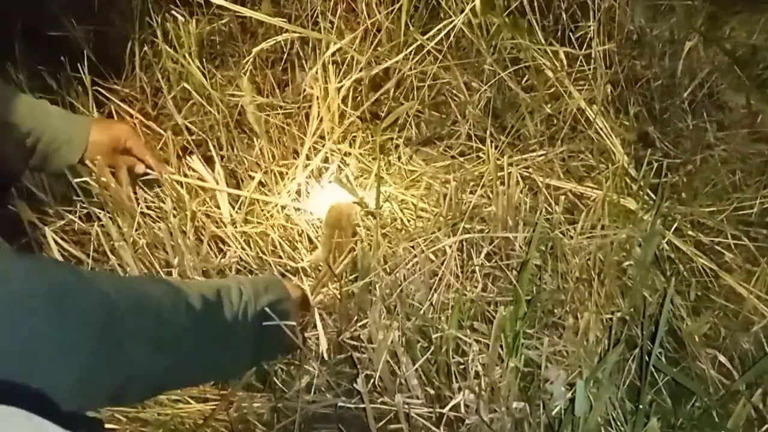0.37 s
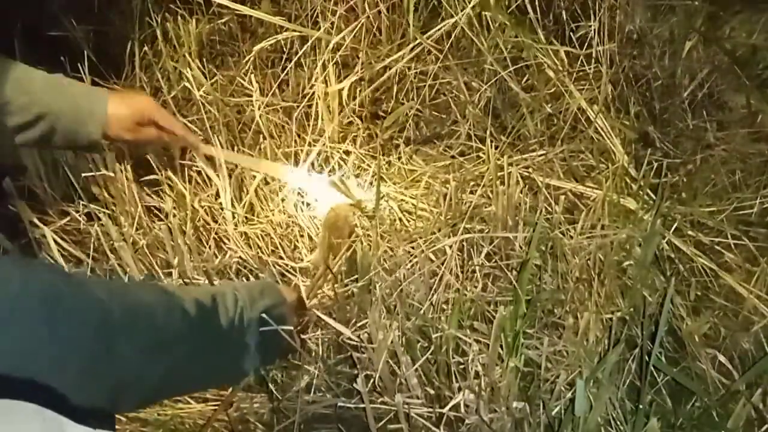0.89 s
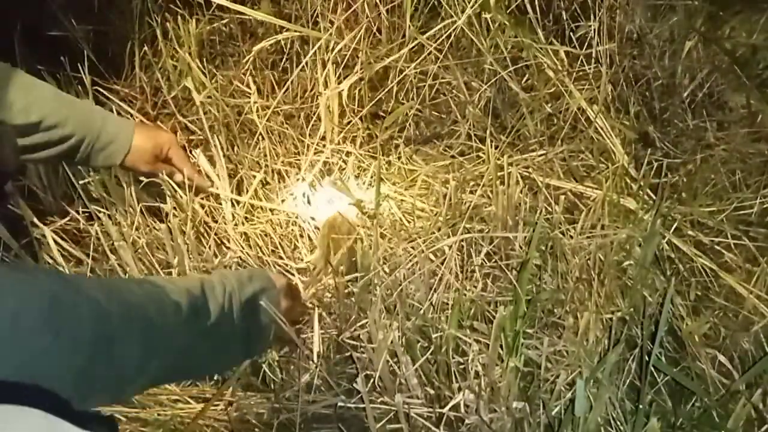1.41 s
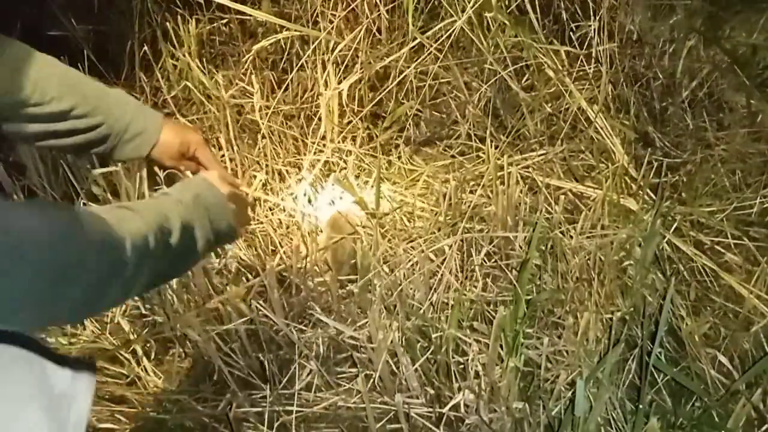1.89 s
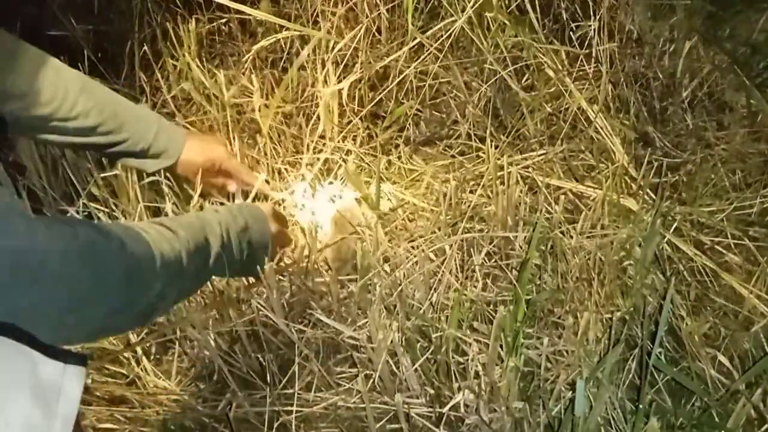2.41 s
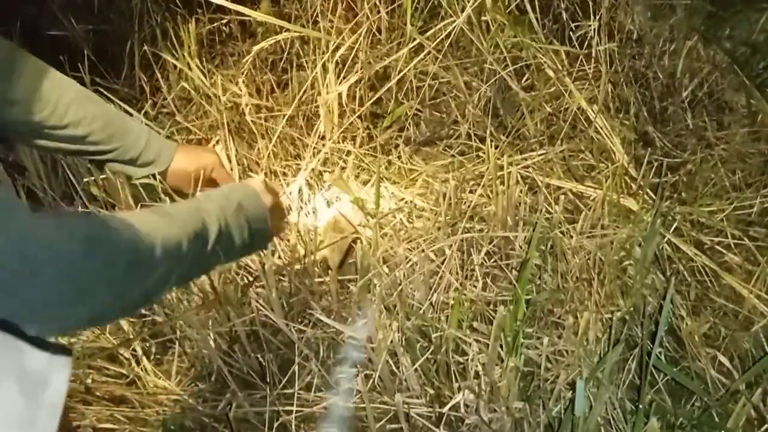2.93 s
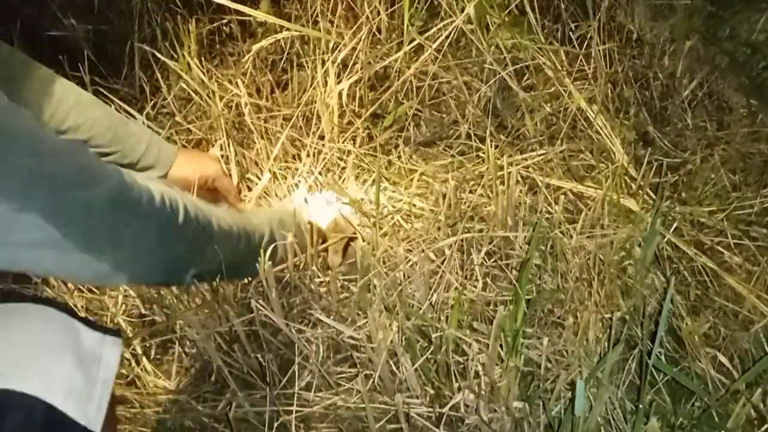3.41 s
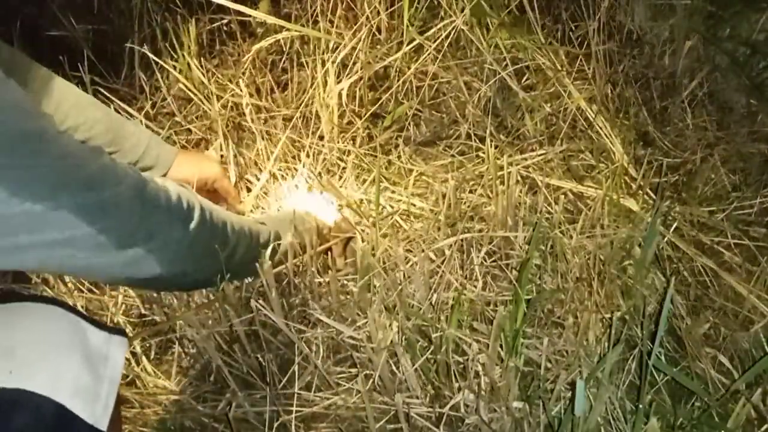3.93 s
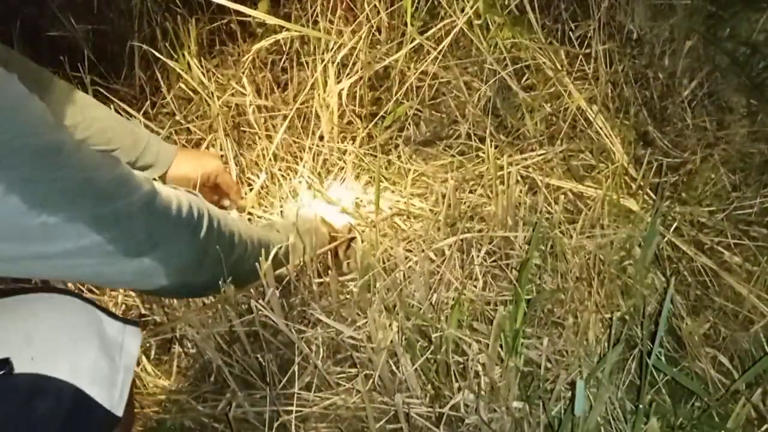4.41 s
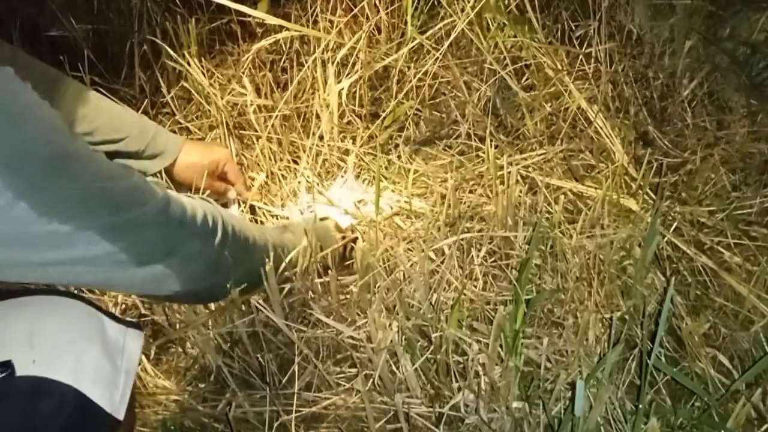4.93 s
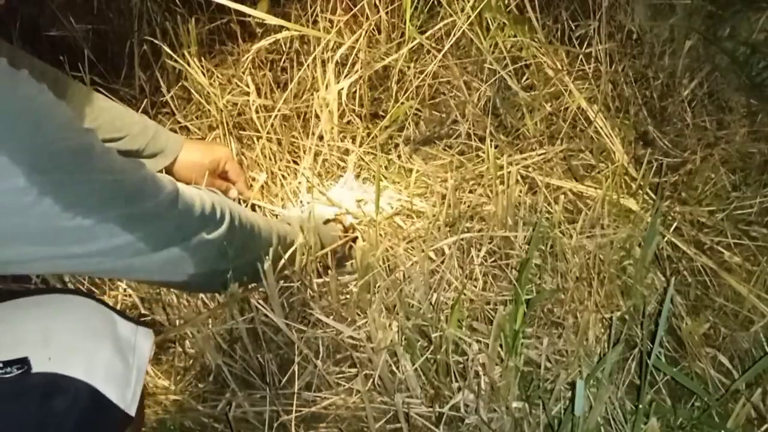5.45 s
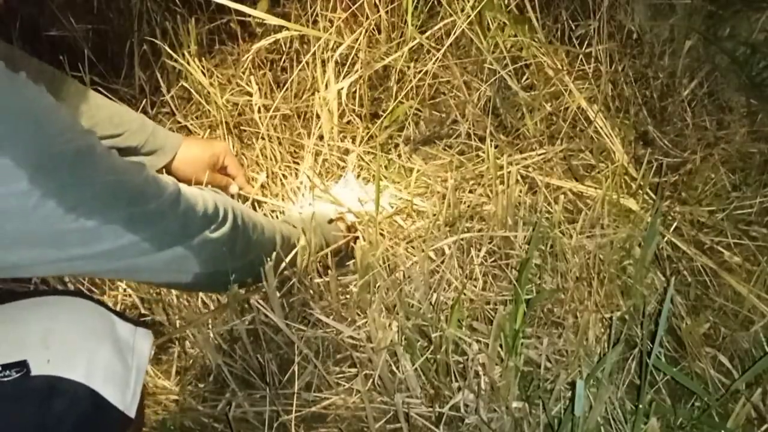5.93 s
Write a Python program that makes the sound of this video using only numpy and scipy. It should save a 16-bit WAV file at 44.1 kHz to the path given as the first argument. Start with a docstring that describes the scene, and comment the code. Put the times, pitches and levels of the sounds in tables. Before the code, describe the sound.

Night grassland insects trill and chirp densely over a faint low engine hum, with small dry grass cracks, a soft knock and one rough croak.

```python
"""Grassland at night, one microphone worn by a person standing in dry grass: two crickets close by chirp in
pulsed tones, tree crickets trill near and far, a katydid buzzes and ticks, and distant trills blur into a
chorus. Far off a small engine hums at its firing rate with a noisy exhaust rasp; a frog croaks once in pulsed
noise. Hands part the grass beside the microphone: short cracks, grainy rustles and a soft knock on the ground."""
import sys
import numpy as np
from scipy import signal
from scipy.fft import rfft, irfft, next_fast_len
from scipy.io import wavfile
from scipy.ndimage import uniform_filter1d, map_coordinates

SR = 44100
rng = np.random.default_rng(int(sys.argv[2]) if len(sys.argv) > 2 else 0)


def gain_from_db(level_db):
    """Turn a decibel level (scalar or array-like) into a linear amplitude factor."""
    decades = np.asarray(level_db, float) / 20
    return 10 ** decades


def persist_wave(psi):
    """Save psi, clipped to +-1, as 16-bit WAV."""
    counts = np.round(np.clip(psi, -1, 1) * 32767).astype(np.int16)
    wavfile.write(sys.argv[1], SR, np.atleast_2d(counts).T)


N = 267596
T = np.arange(N) / SR
TOP_HZ = 15500  # upper band limit

# night air, relative spectrum: f/Hz, level/dB (per Hz)
AIR = [(20, -15), (45, -20.5), (75, 2.5), (130, -7), (200, -19), (420, -24), (800, -21.5), (1600, -25.5),
       (2550, -59), (3400, -27.5), (4000, -41), (5000, -39.5), (6300, -28), (8300, -33.5), (10100, -45),
       (16000, -37)]

# far engine, hum at the firing rate: t/s, level/dB
HUM_LEVEL = [(0.0, -41), (0.93, -37), (2.09, -40.5), (4.17, -35.5), (5.09, -34.5), (6.07, -40.5)]
FIRING_HZ = 73.25
# further orders of the hum, relative to one another: multiple of the firing rate, level/dB
ORDERS = [(4 / 3, -18), (5 / 3, -22), (3, -27)]
# the octave of the hum: t/s, level/dB
OCTAVE_LEVEL = [(0, -55.5), (.8, -56), (2, -52), (3.9, -50.5), (4.5, -55), (6.07, -53.5)]
# exhaust rasp, relative spectrum: f/Hz, level/dB (per Hz)
RASP = [(500, -18), (800, -30), (900, -8), (960, 3.5), (1030, -1), (1100, 3), (1180, -2.5), (1400, -8),
        (1800, -30)]
# exhaust rasp: t/s, level/dB
RASP_LEVEL = [(0, -46), (1, -50.5), (1.7, -47.5), (3.6, -49.5), (3.66, -52), (4.2, -54), (6.07, -53.5)]
# duller rasp, relative spectrum: f/Hz, level/dB (per Hz)
DULL_RASP = [(350, -25), (450, -5.5), (700, -12.5), (830, 3.5), (950, -10), (1200, -39)]
# the duller rasp clears as the engine runs on: one drop, then a steady fade
DULL_DB, DULL_UNTIL_S, DULL_DROP_DB, DULL_FADE_DB_PER_S = -51.5, 0.64, 5, 2
# spells when the pipe rings at each puff: t/s, length/s, f/Hz, level/dB
PIPE_RINGS = [(1.045, 0.6, 970, -50), (1.564, 0.34, 1112, -47.5), (1.905, 0.93, 967, -52),
              (2.05, 0.5, 1090, -49), (2.89, .74, 1097, -49.5), (3.25, 0.48, 972, -60)]

# trills of the nearest tree cricket: t/s, length/s, level/dB
TRILLS = [(0, 0.04, -39), (0.274, .31, -30.5), (0.833, 0.32, -30), (1.423, 0.33, -34), (1.855, 0.34, -31.5),
          (2.435, 0.3, -32), (2.929, 0.3, -30), (3.457, 0.28, -29), (3.955, .32, -30.5),
          (4.594, .33, -30.5), (5.108, 0.36, -32.5), (5.663, 0.24, -31), (5.93, .2, -34.5)]
TRILL_RATE = 60.7  # wing strokes per s
GROVE_DB, GROVE_HIGH_DB = -43, -54.5  # farther tree crickets: middle voices, high voice
# swells of the middle voices: t/s, half width/s, level/dB
GROVE_SWELLS = [(1.6, 0.18, 3), (3.25, 1, -1)]

# distant trill voices and overtones in phrases; 5960 Hz is the tree crickets' octave,
# 1823 Hz a lower partial of the 2161 Hz trill:
# f/Hz, pitch scatter/Hz, fall in a stroke/Hz, rate/(strokes per s), drift/strokes,
# phrase/s, first phrase t/s, sung share of the phrase, level/dB (before the phrasing)
CHORUS = [(2161, 21.4, 44, 120.7, 0.15, 0.28, 0.191, 0.98, -47),
          (2075, 12, 15, 120.7, 0.16, 1, 0.058, 0.99, -50.5),
          (2231, 25, 29, 123, 0.12, 0.72, 0.14, 1, -51.5), (2743, 18, 89, 57, 0.11, 0.48, 0.29, 0.99, -58),
          (1823, 8.1, 59, 110, 0.11, 0.32, 0.0087, 0.91, -59.5),
          (5340, 60, 820, 18.1, .15, 0.9, 0.0059, 0.93, -70),
          (5340, 32, 730, 36.3, 0.213, 0.56, 0.018, 0.89, -72),
          (5960, 70, 180, 58, 0.72, 0.36, 0.018, 0.78, -61.5),
          (7200, 42, 79, 101, .15, 0.24, 0.043, .99, -58),
          (7307, 75, 180, 171, 1.5, .328, 0.225, 0.64, -50.5),
          (8960, 210, 130, 170, 0.68, 0.15, 0.0065, 0.84, -69),
          (9530, 130, 200, 230, 0.58, .119, 0.023, 0.35, -71)]
# phrases of a climbing bush cricket: start t/s
CLIMBS = [-.15, .19, .54, .86, 1.12, 1.44, 1.78, 2.15, 2.5, 2.86, 3.18, 3.52, 3.87, 4.2, 4.52, 4.82, 5.1,
          5.42, 5.74, 6.04, 6.4]
CLIMB_FROM_HZ, CLIMB_TO_HZ = 7560, 7960
CLIMB_SHARE, CLIMB_REST = 0.6, .06  # top reached at, and rest, as shares of the phrase
# bush cricket: t/s, level/dB
CLIMB_LEVEL = [(0, -59), (1.6, -61), (2.7, -58), (3.4, -60.5), (6.07, -60)]

# buzzes inside the katydid's wing cycle: from, to (shares of the cycle), level/dB
BUZZ = [(.02, .13, -67), (.135, .155, -62), (.18, 0.655, -60), (.7, .82, -61)]
# katydid's buzz, relative spectrum: f/Hz, level/dB (per Hz)
KATYDID = [(9000, -40), (11000, -29), (13900, -35), (14500, -3), (15000, -2), (15600, -4)]
# katydid's pace: t/s, wing cycles done
PACE = [(-.0745, -1), (.0188, 0), (1.0455, 11), (1.522, 16), (2.926, 31), (5.025, 54), (6.134, 66)]
TICK_JITTER_S = .0012

# how a near cricket sings: f/Hz, rate/(wing strokes per s), level/dB, warm-up/strokes
HIGH = (6811, 104.5, -36.5, 0.7)
# moods of the lower cricket, same columns
STEADY = (6594, 103.5, -36, 1.07)
HURRIED = (6597, 116.5, -36.5, 2.5)
TIMID = (6445, 100, -45, 0.5)
# the higher cricket keeps one beat through chirps and rests, slowing a little as it tires
FIRST_BEAT_S, BEAT_S, LONGER_PER_BEAT_S = .0518, .009382, 1.176e-7
SHORT_STROKES, REST_BEATS = 8, 11
# chirps with one stroke more: chirp number
ONE_MORE_STROKE = [0, 1, 2, 3, 4, 5, 6, 12, 14, 16, 20, 22, 24, 28, 30]
# chirps whose rest is one beat shorter: chirp number
REST_CUT = [0, 1, 2, 4, 5, 11]
# chirps whose rest is one beat longer: chirp number
REST_DRAWN_OUT = [24]
# the lower cricket finds its rhythm: t/s, wing strokes, mood
LOW_CHIRPS = [(0.1058, 4, STEADY), (0.2623, 4.4, STEADY), (1.077, 1.7, TIMID), (1.775, 4.8, TIMID),
              (1.98, 1, TIMID), (2.117, 3, TIMID), (2.247, 4, TIMID), (2.298, 3.5, HURRIED),
              (2.414, 8, HURRIED), (2.555, 10, HURRIED), (2.724, 8.3, HURRIED), (2.889, 10.4, HURRIED),
              (3.06, 10, HURRIED), (3.2628, 7.4, STEADY), (3.4578, 7.2, STEADY), (3.6555, 5, STEADY),
              (3.815, 6, STEADY), (3.992, 7.2, STEADY), (4.1578, 8, STEADY), (5.8097, 8.5, STEADY),
              (5.985, 7.4, STEADY)]
RUN_S, RUN_EVERY_S, RUN_CHIRPS, RUN_STROKES = 4.3427, .18446, 8, 7  # its even run

# grass parted: t/s, level/dB, rise/s, fall/s
RUSTLES = [(.2, -53, 0.065, 0.29), (1.86, -59, 0.079, 0.22)]
# rustling grass, relative spectrum: f/Hz, level/dB (per Hz)
GRASS = [(1500, -34), (4000, -4.5), (9000, -5), (13000, -12), (16000, -20)]
# dry stalks snap: t/s, level/dB, f/Hz, t60/s
SNAPS = [(0.2568, -34.5, 9550, .016), (.2588, -40, 11000, .01), (.2605, -42, 5700, .008),
         (.342, -37, 5500, 0.0055), (2.571, -42, 8000, .004), (4.489, -31.5, 15200, 0.0058),
         (4.4893, -44, 5000, .006), (5.9135, -42, 4470, 0.0083)]
# a soft knock on the ground: t/s, level/dB (before the soil's own levels)
KNOCK = [(4.843, -37.5), (4.859, -35), (4.874, -37)]
# ringing of the knocked soil: f/Hz, relative level/dB, t60/s
SOIL = [(165, 2.5, 0.14), (357, 9, 0.044), (900, -1, 0.051)]

# frog's throat, relative spectrum: f/Hz, level/dB (per Hz)
THROAT = [(570, -33), (640, 3.5), (700, 9), (860, 8), (1050, -35)]
# frog's vocal sac, relative spectrum: f/Hz, level/dB (per Hz)
SAC = [(750, -8), (900, 1), (980, 0), (1020, 11.5), (1070, 5.5), (1200, -3.5), (1700, -16.5)]
CROAK_S, CROAK_ATTACK_S = 4.25, 0.0086
THROAT_DB, THROAT_HOLD_S, THROAT_RELEASE_S = -47.5, 0.3, .05
# the sac starts slack, fills, empties
SAC_DB, SAC_FILL_S, SAC_HOLD_S, SAC_RELEASE_S, SAC_SLACK_DB = -39.5, 0.19, 0.2, 0.14, 14


def unit(x):
    """Scaled to rms 1."""
    return x / np.sqrt(np.mean(x ** 2) + 1e-20)


def curve(rows):
    """One value per sample from (time, value) rows."""
    s, values = np.transpose(rows)
    return np.interp(T, s, values)


def wobble(rate):
    """A smooth random curve, rate knots a second."""
    return map_coordinates(rng.standard_normal(int(N * rate / SR) + 4), [T * rate])


def shape(start_s, rise_s, hold_s, fall_s, depth_db):
    """Attack, hold and release in dB: 0 at the top, -depth_db at both ends, -120 outside."""
    corners = start_s + np.cumsum([0, rise_s, hold_s, fall_s])
    return np.interp(T, corners, [-depth_db, 0, 0, -depth_db], -120, -120)


def coloured(x, points):
    """x shaped by (Hz, dB) points on a log frequency axis, rms 1."""
    m = next_fast_len(N + 8192)
    hz, db = np.transpose(points)
    log_hz = np.log(np.fft.rfftfreq(m, 1 / SR) + 1)
    gain = gain_from_db(np.interp(log_hz, np.log(hz), db, -120, -120))
    return unit(irfft(rfft(x, m) * gain, m)[:N])


def strokes(count, hz, scatter_hz, fall_hz, rate, duty, scatter_db, overtone_db=-60, loose=0.93):
    """One tone pulse per wing stroke (count: running stroke number); pitch falls as the wing closes."""
    k = np.floor(count).astype(int)
    u = np.clip((count - k) / duty, 0, 1)  # progress through the stroke
    luck = rng.standard_normal((k.max() - k.min() + 1, 3))
    slip = loose * np.cumsum(luck[:, 1])[k - k.min()]  # each stroke keeps the phase only loosely
    luck = luck[k - k.min()]
    bend = scatter_hz * luck[:, 0] * u + fall_hz * (u - u * u) / 2  # falls from +fall/2 to -fall/2
    cycles = np.cumsum(hz + 0 * u) / SR + bend * duty / rate
    phase = 2 * np.pi * cycles + slip
    envelope = gain_from_db(scatter_db * luck[:, 2]) * np.sin(np.pi * u) ** 0.77
    return envelope * (np.sin(phase) + gain_from_db(overtone_db) * np.sin(2 * phase))


def field(x, t60, wet_db):
    """Scatter from grass and bushes: a short noisy tail that changes as the leaves move."""
    t = np.arange(SR // 3) / SR
    tails = rng.standard_normal((2, len(t))) * gain_from_db(-60 * t / t60) * (t > .004)
    a, b = signal.fftconvolve(x[None], tails / np.linalg.norm(tails[0]), axes=1)[:, :N]
    sway = 2 * wobble(3)
    return x + gain_from_db(wet_db) * (np.cos(sway) * a + np.sin(sway) * b)


def night_air():
    """Broadband noise of the open air, its level wavering slowly."""
    return gain_from_db(-44 + 0.71 * wobble(1.14)) * coloured(rng.standard_normal(N), AIR)


def pipe_ring(phase, hz):
    """The exhaust pipe rings afresh at each firing, as one short tone pulse."""
    pulses = strokes(phase / (2 * np.pi) + 0.84, hz, scatter_hz=10.3, fall_hz=16, rate=FIRING_HZ,
                     duty=0.83, scatter_db=0.5, loose=0.562)
    return unit(gain_from_db(1.3 * wobble(7.92)) * pulses)


def engine():
    """Far off: firing hum with its orders, and an exhaust rasp that puffs once a firing."""
    phase = 2 * np.pi * (FIRING_HZ * T + 0.016 * wobble(4.1))
    firing = gain_from_db(curve(HUM_LEVEL) + 0.17 * wobble(10)) * np.sin(phase)
    octave = gain_from_db(curve(OCTAVE_LEVEL) + 1.66 * wobble(4.9)) * np.sin(2 * phase)
    orders = sum(gain_from_db(db + 3.8 * wobble(5.1)) * np.sin(k * phase + 6 * rng.random()) for k, db in ORDERS)
    hum = np.sqrt(2) * (firing + octave + gain_from_db(-41.0) * orders)  # root 2: levels are rms
    puffs = 0.59 + np.maximum(np.cos(phase + 1.28), 0) ** 5
    rasp = coloured(puffs * rng.standard_normal(N), RASP)
    rasp = gain_from_db(curve(RASP_LEVEL) + 1.76 * wobble(7.14)) * rasp
    dull_db = DULL_DB - (T > DULL_UNTIL_S) * (DULL_DROP_DB + DULL_FADE_DB_PER_S * (T - DULL_UNTIL_S))
    dull = gain_from_db(dull_db) * coloured(puffs * rng.standard_normal(N), DULL_RASP)
    rings = sum(gain_from_db(db + shape(s, 0.02, length - .06, 0.028, depth_db=2)) * pipe_ring(phase, hz)
                for s, length, hz, db in PIPE_RINGS)
    return hum + rasp + rings + dull


def near_tree_cricket():
    """Separate trills of wing strokes, each rising in pitch and level, then dying away at its end."""
    near = np.zeros(N + SR)
    for s, length, db in TRILLS:
        number = np.arange(int(round(length * TRILL_RATE) / TRILL_RATE * SR)) * TRILL_RATE / SR
        trill = strokes(number, hz=2915 - 55 * np.exp(-number / 6), scatter_hz=14, fall_hz=190,
                        rate=TRILL_RATE, duty=0.76, scatter_db=1.5, overtone_db=-25, loose=.7)
        onset_db = 5 * np.exp(-number / 1.6)
        ending_db = 5.7 * np.exp((number - number[-1]) / 1.3)
        near[round(s * SR):][:len(trill)] += gain_from_db(db - onset_db - ending_db) * trill
    return field(near[:N], t60=0.06, wet_db=-11)


def grove_voice(hz, rate):
    """One farther tree cricket stroking without a break, its pace and level wandering; rms 1."""
    song = strokes(rate * T + 0.248 * wobble(2), hz, scatter_hz=17, fall_hz=131, rate=rate,
                   duty=0.74, scatter_db=2.1, loose=1.123, overtone_db=-23.5)
    return unit(gain_from_db(1.7 * wobble(4.52)) * song)


def tree_crickets():
    """A near singer in separate trills over farther ones that overlap."""
    swell_db = sum(db * np.exp(-((T - s) / width) ** 2) for s, width, db in GROVE_SWELLS)
    middle = unit(grove_voice(2975, 56.5) + 0.93 * grove_voice(2890, 64.5))
    far = gain_from_db(GROVE_DB + swell_db) * middle + gain_from_db(GROVE_HIGH_DB) * grove_voice(3110, 57.5)
    return near_tree_cricket() + field(far, t60=0.25, wet_db=-9.0)


def bush_cricket():
    """A blurred trill whose pitch climbs to a plateau, then breaks off."""
    done = np.interp(T, CLIMBS, np.arange(len(CLIMBS))) % 1  # share of the phrase
    hz = np.interp(done, [0, CLIMB_SHARE], [CLIMB_FROM_HZ, CLIMB_TO_HZ])
    sung = gain_from_db(curve(CLIMB_LEVEL)) * uniform_filter1d(1. * (done < 1 - CLIMB_REST), 600)
    # 118 strokes a second; rate=150 narrows the given scatter and fall by 118/150
    song = strokes(118 * T + 1.56 * wobble(4), hz, scatter_hz=170, fall_hz=250, rate=150,
                   duty=0.66, scatter_db=1.0, loose=np.pi)
    return sung * unit(song)


def chorus():
    """Distant trill voices and overtones, pulsed by stroke and gated into phrases, blurred by distance."""
    out = bush_cricket()
    for hz, scatter_hz, fall_hz, rate, drift, phrase, first, share, db in CHORUS:
        sung = 1. * ((T - first) / phrase % 1 < share)
        sung = uniform_filter1d(sung, int(0.073 * phrase * SR))
        song = strokes(rate * T + drift * wobble(3), hz, scatter_hz, fall_hz, rate=rate,
                       duty=0.784, scatter_db=2.0, loose=np.pi)
        out = out + gain_from_db(db + 0.9 * wobble(2.97)) * sung * unit(song)
    return field(out, t60=0.28, wet_db=-7)


def katydid():
    """Each wing cycle opens with a sharp tick, then a slip, a long and a short buzz."""
    when, done = np.transpose(PACE)
    s = np.interp(np.arange(done[0], done[-1] + 1), done, when)
    s = s + TICK_JITTER_S * rng.standard_normal(len(s))
    share = np.interp(T, s, np.arange(len(s))) % 1
    gate = gain_from_db(-63.5)  # farther katydids, steady
    gate = gate + sum(gain_from_db(level) * (share > a) * (share < b) for a, b, level in BUZZ)
    teeth = gain_from_db(3.6 * wobble(900))  # single teeth of the file
    buzz = uniform_filter1d(gate, 60) * coloured(teeth * rng.standard_normal(N), KATYDID)
    s = s[(s > 0) & (s < T[-1])]
    blows = np.zeros(N)
    blows[np.round(s * SR).astype(int)] = gain_from_db(-39.5 + 1.2 * rng.standard_normal(len(s)))
    t = T[:160]
    tones = [(15200, 1.76), (11800, 0.3), (13400, 0.27)]  # f/Hz, amplitude
    tick = gain_from_db(-60 * t / 0.004) * sum(a * np.sin(2 * np.pi * hz * t) for hz, a in tones)
    return buzz + np.convolve(blows, tick)[12:N + 12]  # ticks lead by 12 samples


def high_chirps():
    """(s, strokes, manner) of the higher cricket, counted off on its slowing beat."""
    k = np.arange(int(N / SR / BEAT_S / (SHORT_STROKES + REST_BEATS)) + 1)
    sung = SHORT_STROKES + np.isin(k, ONE_MORE_STROKE)
    cycle = sung + REST_BEATS - np.isin(k, REST_CUT) + np.isin(k, REST_DRAWN_OUT)
    beat = np.cumsum(cycle) - cycle
    starts = FIRST_BEAT_S + BEAT_S * beat + LONGER_PER_BEAT_S * beat ** 2 / 2
    return [(s, n, HIGH) for s, n in zip(starts, sung) if s < N / SR]


def crickets():
    """Two near singers chirp in a few wing strokes; the first strokes are weak and flat."""
    out = np.zeros(N + SR)
    run = [(RUN_S + RUN_EVERY_S * k, RUN_STROKES, STEADY) for k in range(RUN_CHIRPS)]
    for s, count, (hz, rate, db, warm) in high_chirps() + LOW_CHIRPS + run:
        number = np.arange(int(round(count) / rate * SR)) * rate / SR
        cold = warm * np.exp(-np.floor(number) / warm)
        chirp = strokes(number, hz - 45 * cold, scatter_hz=15, fall_hz=110, rate=rate,
                        duty=0.9, scatter_db=0.5, loose=1.2)
        out[round(s * SR):][:len(chirp)] += gain_from_db(db - 2.7 * cold) * chirp
    return field(out[:N], t60=0.066, wet_db=-18.0)


def hands():
    """At the microphone: stalks crack in decaying tone and noise, grass rustles, the soil rings."""
    out, t = np.zeros(N + SR), T[:SR // 8]
    for s, db, hz, t60 in SNAPS:
        crack = np.sin(2 * np.pi * hz * t) + 0.61 * rng.standard_normal(len(t))
        out[round(s * SR):][:len(t)] += gain_from_db(db - 60 * t / t60) * crack
    for s, db in KNOCK:
        ring = sum(gain_from_db(level - 60 * t / t60) * np.sin(2 * np.pi * hz * t) for hz, level, t60 in SOIL)
        out[round(s * SR):][:len(t)] += gain_from_db(db) * ring * (1 - np.exp(-t / 0.0027))  # soft onset
    grains = unit(gain_from_db(3.2 * wobble(300))) * rng.standard_normal(N)
    parting = sum(gain_from_db(db + shape(s, rise, 0, fall, depth_db=24)) for s, db, rise, fall in RUSTLES)
    return out[:N] + parting * coloured(grains, GRASS)


def croak_pulses(rate, rest):
    """Noise pulsing rate times a second; rest is what remains between pulses."""
    beat = np.sin(np.pi * (rate * T + 0.5 * wobble(15))) ** 2
    return (rest + beat) * rng.standard_normal(N)


def frog():
    """A rough croak: noisy pulses in a low throat and a higher vocal sac."""
    throat_db = THROAT_DB + shape(CROAK_S, CROAK_ATTACK_S, THROAT_HOLD_S, THROAT_RELEASE_S, depth_db=22)
    sac_db = SAC_DB + shape(CROAK_S, SAC_FILL_S, SAC_HOLD_S, SAC_RELEASE_S, depth_db=SAC_SLACK_DB)
    throat = gain_from_db(throat_db) * coloured(croak_pulses(33, 0.47), THROAT)
    return throat + gain_from_db(sac_db) * coloured(croak_pulses(34, 0.78), SAC)


def scene():
    """All sources over the night air, in one channel."""
    insects = tree_crickets() + chorus() + katydid() + crickets()
    return (night_air() + engine() + insects + hands() + frog())[None]


def roll_off(x):
    """The treble ends steeply here."""
    return signal.sosfilt(signal.butter(12, 16840, fs=SR, output="sos"), x)


def record(dry):
    """The microphone's mix, with nothing kept above the band limit."""
    below_limit = np.fft.rfftfreq(N, 1 / SR) < TOP_HZ
    kept = irfft(rfft(dry) * below_limit, N)
    return roll_off(kept)


dry = scene()
out = record(dry)
persist_wave(out)
```